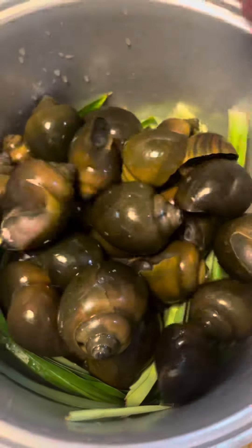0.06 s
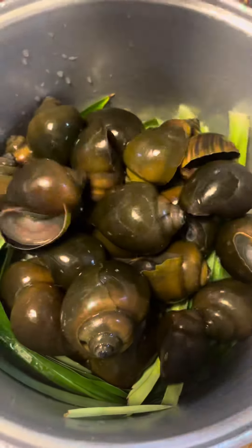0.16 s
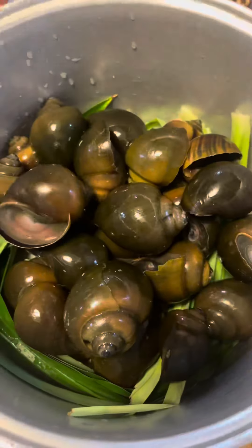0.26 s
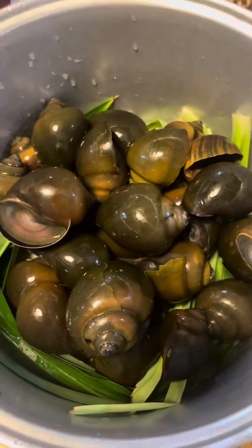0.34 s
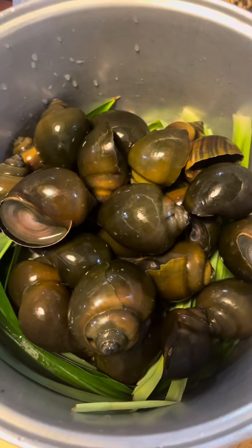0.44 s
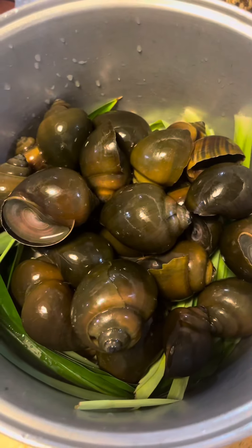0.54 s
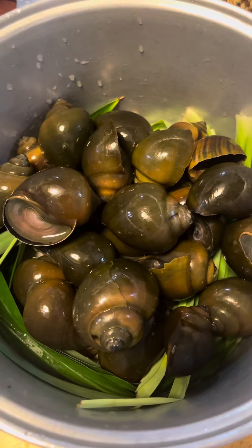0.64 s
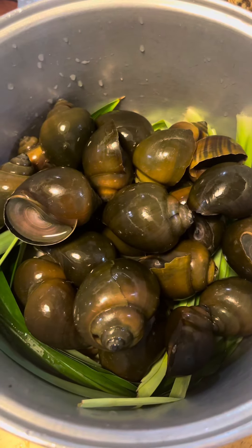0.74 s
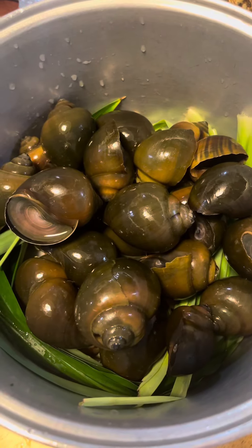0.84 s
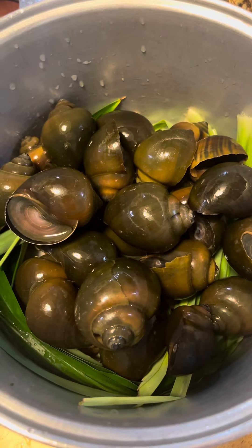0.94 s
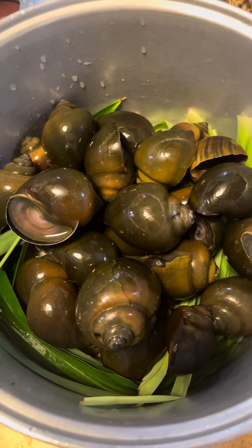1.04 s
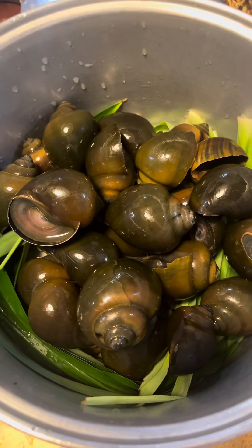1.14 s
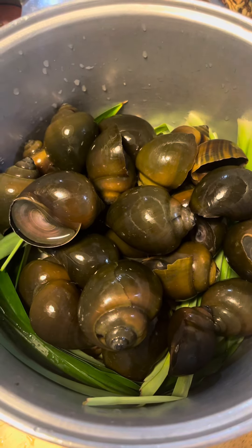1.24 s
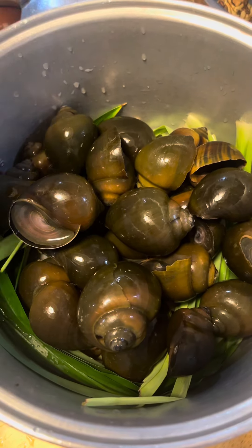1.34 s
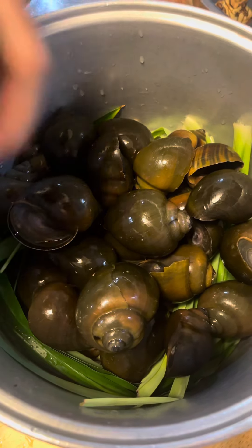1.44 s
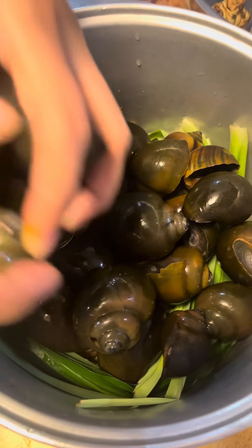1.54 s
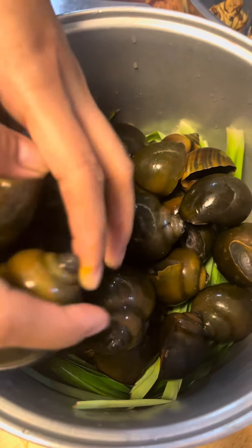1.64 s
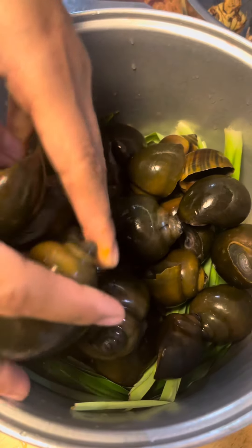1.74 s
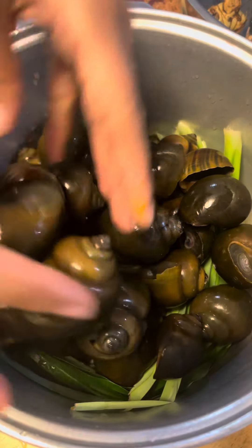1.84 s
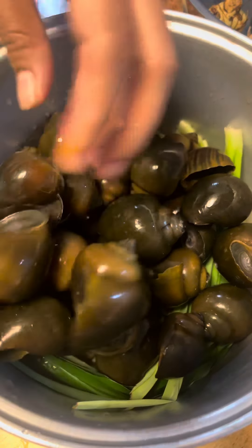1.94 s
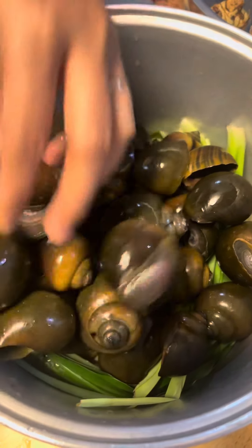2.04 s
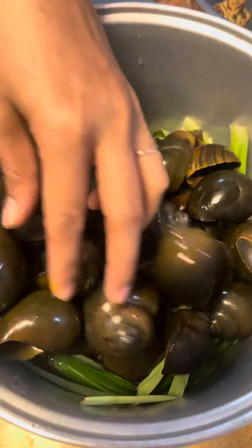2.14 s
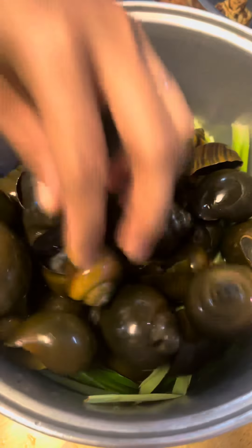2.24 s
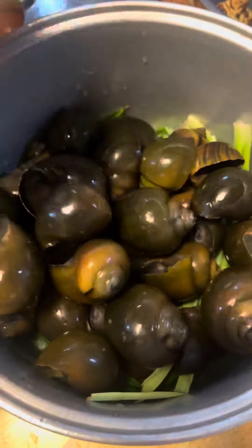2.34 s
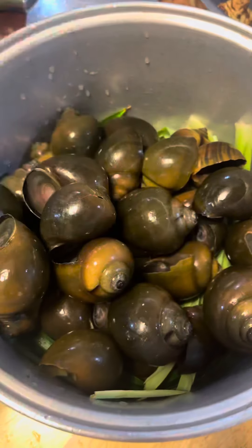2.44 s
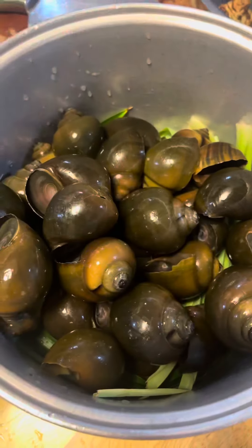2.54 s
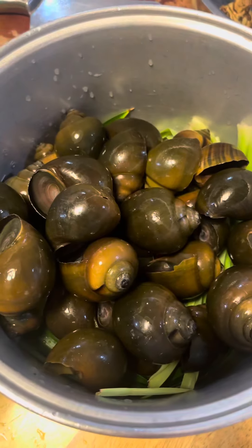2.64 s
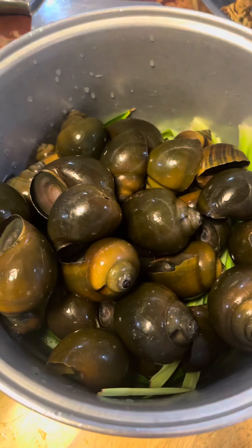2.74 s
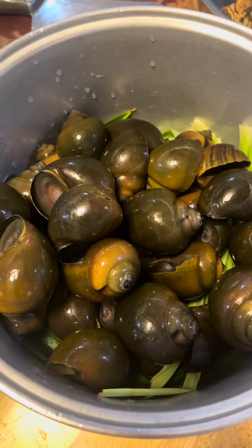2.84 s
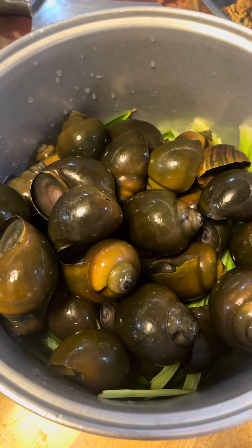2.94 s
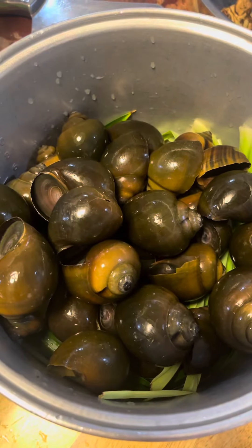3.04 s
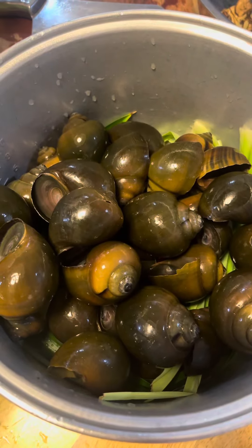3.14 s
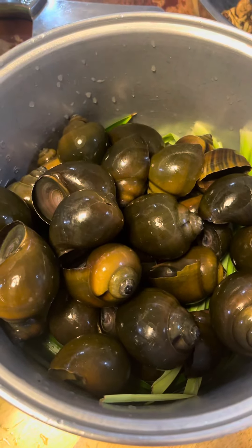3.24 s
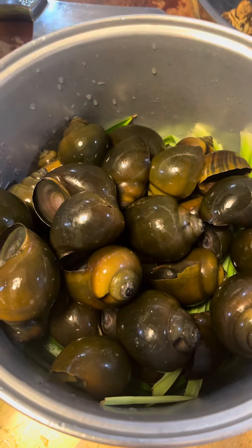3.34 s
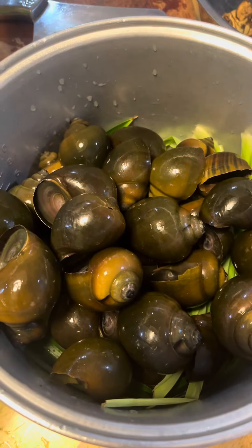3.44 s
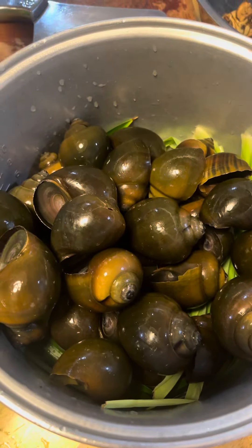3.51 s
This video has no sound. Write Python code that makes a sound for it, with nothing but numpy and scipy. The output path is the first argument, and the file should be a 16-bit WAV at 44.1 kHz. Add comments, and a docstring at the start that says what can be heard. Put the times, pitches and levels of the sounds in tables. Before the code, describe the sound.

Close stereo phone pickup in a small kitchen with low, steady room noise and faint hum. At 0 s shells strike a metal pot, the rim ringing out briefly. From about 0.35 to 1.4 s a hand digs among shells in a hollow basin: woody clacks and gritty grinding, strongest around 0.6-0.9 s. At 1.6-2.4 s a handful clatters into the pot, with hard cracks, scraping, metallic ring and low thuds. More basin clacking and grinding runs 2.45-3.7 s, then a sharp, dense drop at 3.85-4.1 s. Soft bumps follow near 4.3 s and a tiny clink at 4.7. Shells mutter on the bottom from 5 s; a smaller clattering drop comes at 5.3-5.6 s, with light settling until 6.7 and a knock at 6.5. After near quiet, rubbing and dull bumps occur at 7.5-8.1 s, with a clink at 8.06 and a last faint thump at 8.4.

```python
"""Live snails are scooped from a basin and dropped into a metal pot, close to a phone in a small kitchen.
Shells grind and clack as noisy contacts with short modes; the hollow basin colours them by resonance.
Landing shells excite the decaying modes of the pot, then slide and roll in dense showers of contacts.
Soft bumps, light clinks and late rubs use damped modes and shaped noise over steady room noise."""
import sys
import numpy as np
from scipy import signal
from scipy.fft import rfft, irfft, next_fast_len
from scipy.io import wavfile
from scipy.ndimage import uniform_filter1d

SR = 44100
rng = np.random.default_rng(int(sys.argv[2]) if len(sys.argv) > 2 else 0)


def generate_wav(signal):
    """Clip the signal to [-1, 1] and save it as 16-bit WAV at the path in sys.argv[1]."""
    frames = np.transpose(np.atleast_2d(signal))
    scaled = np.clip(frames, -1, 1) * 32767
    pcm = np.round(scaled).astype(np.int16)
    wavfile.write(sys.argv[1], SR, pcm)


N = 399535
TIME = np.arange(N) / SR
SHELL_SAMPLES = 5000
TOUCH_S = .0003  # time constant of the onset of one contact

# modes of the loaded pot wall: [f/Hz, relative level/dB, t60/s]
POT_MODES = [(475, -5, .07), (880, -1, .12), (1720, -9, .16), (2370, -6, .13), (3284, 1, .22),
             (3360, 1, .1), (3772, -5, .18), (5352, -5, .17), (6204, -6, .17), (7073, -5, .17),
             (7392, -3, .17), (10765, -4, .15)]
# modes of the loaded pot bottom: [f/Hz, relative level/dB, t60/s]
BOTTOM_MODES = [(84, -10, 0.11), (168, -11.5, 0.12), (354, -3, 0.023), (468, 2, 0.013)]
# spectrum of the hollow of the basin: [f/Hz, relative density level/dB]
BASIN_SPECTRUM = [(300, -44), (680, 6.5), (850, 12), (1000, 1), (1500, -22.5), (8000, -60)]
# spectrum of shell contacts: [f/Hz, relative density level/dB]
SHELL_SPECTRUM = [(60, -17.5), (200, 2.5), (450, 7.5), (680, 2), (900, 6.5), (1250, -4), (2200, -1),
                  (5500, -3), (8500, -7.5), (11000, -3), (12500, -15.5), (15000, -47)]
# spectrum of dull low contact noise: [f/Hz, relative density level/dB]
RUMBLE_SPECTRUM = [(25, -44.5), (55, 1.5), (100, 4), (320, -1.5), (500, -8.5), (1200, -23.5),
                   (12000, -94.5)]
# the hand works in the basin: [start t/s, end t/s]
IN_BASIN = [(.3, 1.55), (2.42, 3.75)]


def undb(db):
    """Level to amplitude: 20 dB is a factor of ten."""
    return 10 ** (np.asarray(db) / 20)


def unit(x):
    """Energy normalisation: the squared samples sum to 1."""
    return x / np.sqrt(np.sum(x ** 2))


def level(x, db=0):
    """Power normalisation: scale to an rms level in dB."""
    return x * undb(db) / np.sqrt(np.mean(x ** 2))


def fade(t60):
    """Exponential damping: half a second of an envelope that loses 60 dB in t60."""
    return np.exp(-np.log(1000) * TIME[:SR // 2] / max(t60, 1 / SR))


def through(x, response):
    """Linear filtering by convolution with an impulse response; either may have two channels."""
    return signal.oaconvolve(np.atleast_2d(x), np.atleast_2d(response), axes=1)[:, :x.shape[-1]]


def add(track, s, sound):
    """Superposition: mix a sound in at a time in seconds."""
    start = max(int(s * SR), 0)
    track[:, start:start + sound.shape[-1]] += sound[..., :N - start]


def colour(points, size=4096):
    """Minimum phase: fold the cepstrum of a spectrum into a causal response of unit energy."""
    hz, db = np.transpose(points)
    bins_hz = np.arange(size // 2 + 1) * SR / size
    spectrum_db = np.interp(np.log(bins_hz + 1), np.log(hz), db)
    cepstrum = irfft(np.log(undb(spectrum_db)))
    cepstrum[1:size // 2] *= 2
    cepstrum[size // 2 + 1:] = 0
    return unit(irfft(np.exp(rfft(cepstrum))))


def ring(modes, scatter_db=0, detune=0):
    """Modal superposition: damped sines of random sign; strength and pitch may vary between strikes."""
    t = TIME[:SR // 2]
    total = np.zeros(len(t))
    for (hz, db, t60), (strength, sign, shift) in zip(modes, rng.standard_normal((len(modes), 3))):
        tone = np.sin(2 * np.pi * hz * (1 + detune * shift) * t)
        total += undb(db + scatter_db * strength) * np.sign(sign) * fade(t60) * tone
    return unit(total)


def brighten(x, treble_db, split_hz=4000, order=2):
    """Spectral balance: a zero-phase split sets the treble against the body, as contact hardness does."""
    body = signal.sosfiltfilt(signal.butter(order, split_hz, fs=SR, output="sos"), x)
    return body + undb(treble_db) * (x - body)


def stroke(s, hold_s, rise_db_per_s, fall_db_per_s):
    """Exponential envelope of one movement: it swells up to its time, holds and dies away."""
    early_s = np.maximum(s - TIME, 0)
    late_s = np.maximum(TIME - s - hold_s, 0)
    return undb(-rise_db_per_s * early_s - fall_db_per_s * late_s) + 1e-12


def during(spans):
    """Time window: gain 1 within the given spans, 0 outside, with edges softened by a moving average."""
    gate = sum(1. * ((TIME > start) & (TIME < end)) for start, end in spans)
    return uniform_filter1d(gate, SR // 20)


def pock(t60, count):
    """Cavity resonance of one shell: a few quickly damped notes over the range of shell sizes."""
    low_hz, high_hz = 982, 2750  # hollow notes of large to small shells
    t = TIME[:SHELL_SAMPLES]
    hz = low_hz * (high_hz / low_hz) ** ((np.arange(count) + rng.random(count)) / count)
    phase = rng.random((count, 1))
    notes = np.sin(2 * np.pi * (hz[:, None] * t + phase)).sum(0)
    return unit(notes * fade(t60)[:len(t)] * (1 - np.exp(-t / TOUCH_S)))


def shell(ring_t60, crack_t60, echo_db, echo_t60, side_t60=0.12, side_db=-12, count=10):
    """Impact excitation in stereo: a noisy crack, the shell's short modes and dense wall echoes."""
    size = SHELL_SAMPLES
    t = TIME[:size]
    hz = np.geomspace(1100, 11000, count) * np.exp(rng.uniform(-0.204, .2, count))
    strengths = rng.normal(size=(count, 1)) * hz[:, None] ** 0.58
    modes = (np.sin(2 * np.pi * hz[:, None] * t) * strengths).sum(0)
    crack, echoes, rim = rng.standard_normal((3, size))
    mid = unit(modes * fade(ring_t60)[:size])
    mid = mid + unit(crack * fade(crack_t60)[:size])
    mid = mid + undb(echo_db) * unit(echoes * fade(echo_t60)[:size])
    mid = unit(mid * (1 - np.exp(-t / TOUCH_S)))
    # each shell lies in its own spot, so its reflections off the rim reach the two sides differently
    band = signal.butter(2, [1800, 11000], "band", fs=SR, output="sos")
    side = signal.sosfilt(band, rim * fade(side_t60)[:size])
    return mid + undb(side_db) * unit(side) * np.array([[1], [-1]])


def jostle(rate, spread_db, ring_t60, count, bunch_db=0, hollow=0):
    """Shot noise: random contacts (rate per second), mostly weak; they may bunch, and some may be pocks."""
    strengths_db = spread_db * np.minimum(rng.exponential(size=N), 3)
    sizes = (rng.random(N) < rate / SR) * undb(strengths_db)
    # even out the energy over 60 ms, then let it vary slowly in bunches
    sizes = sizes / np.sqrt(np.abs(uniform_filter1d(sizes ** 2, int(.06 * SR))) + 1 / SR)
    slips = np.arange(0, N / SR, .014)
    sizes = sizes * undb(bunch_db * np.interp(TIME, slips, rng.uniform(-1, 1, len(slips))))
    owner = rng.integers(count, size=N)
    shells = []
    for k in range(count):
        if k < hollow * count:
            shells.append(pock(t60=.011, count=2) * np.ones((2, 1)))
        else:
            shells.append(shell(ring_t60, crack_t60=.005, echo_db=-7, echo_t60=.045))
    out = np.zeros((2, N))
    for i in np.flatnonzero(sizes):
        add(out, TIME[i], sizes[i] * shells[owner[i]][:, :SR // 20])
    return out


def kitchen(noise_db=-49.5, apart_db=-16, diffuse_db=14, diffuse_hz=1650, hum_db=-60):
    """Diffuse-field noise, coherent between sides in the bass and less so above, with a faint hum."""
    # steady room noise: [f/Hz, relative density level/dB]
    room_spectrum = [(25, -36), (60, 0.5), (200, -3.5), (300, -6), (500, -14.5), (1800, -23.5), (2900, -17),
                     (4500, -29.5), (11300, -37.5), (13000, -79.5)]
    # hum of an appliance, as resonances fed by noise: [f/Hz, relative level/dB, t60/s]
    hum_modes = [(196.4, -2.5, 0.63), (617, 0, 0.12)]
    noise = through(rng.standard_normal((3, N)), colour(room_spectrum))
    shared, left, right = level(noise, noise_db)
    hum = level(through(rng.standard_normal(N), ring(hum_modes)), hum_db)
    apart = brighten(np.array([left, right]), diffuse_db, diffuse_hz)
    return brighten(shared, -diffuse_db, diffuse_hz) + hum + undb(apart_db) * apart


def slides(gain_db=4, wall_db=-2, bottom_db=-27, count=8):
    """Frictional excitation: skidding shells scrape and drive the wall, relatively more when forceful."""
    # shells slide in the pot: [t/s, hold/s, relative level/dB, treble against body level/dB]
    slide_events = [(0.0, 0.097, -35.5, 7), (1.689, 0.1, -36.5, 6), (1.775, 0.09, -31, 0.5),
                    (1.978, 0.12, -49.5, -7), (2.139, 0.076, -37, -15), (2.334, 0.018, -31.5, -13),
                    (3.911, 0.093, -28.5, 0), (4.608, 0.12, -47, -8), (5.087, 0.0074, -45, -11),
                    (5.356, 0.094, -36.5, 1), (5.472, 0.026, -33, 0.5), (5.568, 0.43, -44.5, -1.5),
                    (5.814, 0.066, -36, -3), (6.324, 0.071, -47, -2), (6.532, 0.037, -46.5, -2)]
    rise_db_per_s, fall_db_per_s = 594, 209
    strokes = [undb(db) * stroke(s, hold_s, rise_db_per_s, fall_db_per_s) for s, hold_s, db, _ in slide_events]
    gain = np.max(strokes, axis=0)
    bright_db = np.array(slide_events)[:, 3][np.argmax(strokes, axis=0)]  # of the strongest slide
    contacts = jostle(rate=1000, spread_db=4.0, ring_t60=0.02, count=40, bunch_db=5.5, hollow=.05)
    scrape = brighten(through(contacts * gain, colour(SHELL_SPECTRUM)), bright_db)
    wall = unit(sum(ring(POT_MODES, detune=.022) for _ in range(count)) * fade(.25))
    pressed = contacts * gain * (gain / gain.max()) ** .25
    singing = through(brighten(pressed, np.minimum(bright_db, 0), 2000), wall)
    bottom = level(through(contacts, ring(BOTTOM_MODES))) * np.sqrt(gain)
    return undb(gain_db) * scrape + undb(wall_db) * singing + undb(bottom_db) * bottom


def knocks(gain_db=19, treble_db=8, wall_db=-3, bottom_db=-10, rim_db=-5):
    """Impulsive modal excitation: a landing shell and its one rebound ring the wall; the bottom thuds."""
    # landings on the pot wall: [t/s, relative body level/dB, treble against body level/dB before treble_db,
    # relative wall ring level/dB, rebound against first blow level/dB]
    landings = [(0.005, -21.5, 0.5, 0, 4.5), (0.05, -17.5, -18, 8, -22), (1.685, -14, 3.5, 8, -10.5),
                (1.763, -21.5, 4.5, 15, -10), (1.772, -17, 0.5, -9, 3.5), (2.1, -15, 1.5, -11.5, -39),
                (2.309, -14.5, 4, 1, -3.5), (3.914, -11.5, -24, -13, -24), (3.924, -13, 0, -22, -3),
                (3.986, -22.5, 4, 3.5, 1.5), (5.316, -18, -11.5, -6, -33), (5.389, -13, 0, 0.5, -10),
                (5.451, -14.5, -4.5, 7, -8.5), (6.538, -21.5, -14, -4.5, -12)]
    # modes of the free pot rim: [f/Hz, relative level/dB, t60/s]
    rim_modes = [(1098, 6, .75), (1776, -3, .45), (2353, 0, .4), (2654, 1, .45), (3192, 0, .6)]
    rebound_s, rim_start_s = .023, 0.033
    out, body = np.zeros((2, N)), colour(SHELL_SPECTRUM)
    for s, db, bright_db, ring_db, rebound_db in landings:
        for at, blow_db in (s, db), (s + rebound_s, db + rebound_db):
            hit = through(shell(ring_t60=0.055, crack_t60=0.062, echo_db=4.0, echo_t60=0.11, side_t60=0.079), body)
            add(out, at, undb(blow_db + gain_db) * brighten(hit, bright_db + treble_db))
            wall = ring(POT_MODES, scatter_db=3, detune=.012)
            add(out, at, undb(blow_db + gain_db + wall_db + ring_db) * wall)
        add(out, s, undb(db + gain_db + bottom_db) * ring(BOTTOM_MODES, detune=.06))
    # the first handful also shakes the rim: a wash of close modes over the plain ones
    wash = sum(ring(rim_modes, detune=.08) for _ in range(3)) * fade(.7) / 2
    add(out, rim_start_s, undb(rim_db) * (ring(rim_modes) + wash))
    return out


def clacks(gain_db=13.0, treble_db=9, pock_db=-3, split_hz=3200, hollow_db=4):
    """Collision of hollow bodies: each touch has a second touch; those in the basin excite its resonance."""
    # clear shell contacts: [t/s, relative body level/dB, treble against body level/dB before treble_db]
    collisions = [(0.368, -27.5, -6.5), (0.396, -22, -17), (0.417, -19.5, -9), (0.531, -23.5, 0.5),
                  (0.582, -13.5, -6.5), (0.616, -15, -0.5), (0.628, -12.5, -30.5), (0.635, -6.5, -20),
                  (0.645, -8, -25), (0.725, -8.5, -27), (0.756, -9.5, -12), (0.765, -10, -18),
                  (0.82, -7, -12.5), (0.878, -15.5, -10), (0.973, -15, -6.5), (1.013, -17, -7.5),
                  (1.034, -15.5, -4), (1.041, -12.5, -10), (1.11, -21.5, -10), (1.181, -23.5, -23),
                  (1.209, -17.5, -9.5), (1.307, -17.5, -15), (1.362, -20.5, -36), (1.606, -24.5, -6.5),
                  (1.632, -14, -3), (1.637, -6.5, -39), (1.667, -10, -13.5), (1.678, -6.5, -11),
                  (2.076, -5.5, -13), (2.192, -21.5, 5), (2.245, -12.5, -7.5), (2.344, -19, 8.5),
                  (2.474, -15.5, -15), (2.572, -17, -18), (2.653, -13, -18), (2.724, -11, -21.5),
                  (2.746, -17, -29), (2.867, -14, -14), (2.95, -12, -5), (3.015, -20, -4),
                  (3.074, -17.5, -19), (3.17, -19.5, 1.5), (3.207, -20.5, -13), (3.57, -23.5, -4.5),
                  (3.64, -23.5, -9), (3.832, -23, -5), (3.865, -6.5, -10), (3.903, -13.5, 0.5),
                  (3.952, -16, 2), (4.112, -20.5, -6.5), (4.281, -22, -8), (4.624, -32.5, -5),
                  (5.363, -25.5, -1), (5.617, -20, -7), (5.728, -29, 1), (5.886, -25, -1),
                  (5.962, -29, 0.5), (6.69, -34.5, -11), (7.987, -34, -6.5), (8.065, -27, -11)]
    chatter_s, chatter_db = .005, -5.5  # second touch: delay scale and level against the first
    out, body = np.zeros((2, N)), colour(SHELL_SPECTRUM)
    for s, db, bright_db in collisions:
        contact = through(shell(ring_t60=.025, crack_t60=.016, echo_db=-4, echo_t60=.05, side_t60=.04), body)
        contact = contact + undb(pock_db) * pock(t60=.026, count=3)
        again = through(shell(ring_t60=.025, crack_t60=.016, echo_db=-3, echo_t60=.06), body)
        first = brighten(contact, bright_db + treble_db, split_hz, order=5)
        add(out, s, undb(db + gain_db) * first)
        second = brighten(again, bright_db, split_hz)
        add(out, s + chatter_s * rng.uniform(.5, 2.4), undb(db + gain_db + chatter_db) * second)
    hollow = colour(BASIN_SPECTRUM)
    hollow = hollow / np.abs(rfft(hollow)).max()
    return out + undb(hollow_db) * through(out * during(IN_BASIN), hollow)


def scoops(gain_db=-2, effort_slope=0.95, tick_db=-11.5, tick_treble_db=6, hollow_db=-16, rumble_db=-7):
    """Granular contact noise: tumbling shells brighten with effort; the basin answers even gentle stirring."""
    # the hand digs into the shells in the basin: [t/s, hold/s, relative level/dB]
    digs = [(0.62, .17, -24), (0.987, 0.26, -35), (2.465, 0.12, -33), (2.9, 0.11, -28.5),
            (3.134, 0.024, -32.5), (3.586, 0.12, -46.5)]
    # spectrum of the grinding shells: [f/Hz, relative density level/dB]
    digging_spectrum = [(60, 10.5), (200, 18.5), (550, -8.5), (1100, 6.5), (2400, 7), (5500, 4), (8500, -1),
                        (11000, 7), (12500, -3), (15000, -32.5)]
    rise_db_per_s, fall_db_per_s = 126, 189
    slump_db, slump_db_per_s, slump_s = -4, 37, 0.37  # after a dig the heap keeps slumping for a while
    gain = np.zeros(N)
    for s, hold_s, db in digs:
        dig = stroke(s, hold_s, rise_db_per_s, fall_db_per_s)
        slump = stroke(s, slump_s, rise_db_per_s, fall_db_per_s) * stroke(s, hold_s, 0, slump_db_per_s)
        gain = np.maximum(gain, undb(db) * np.maximum(dig, undb(slump_db) * slump))
    effort_db = 20 * np.log10(gain / gain.max() + 0.0065)
    contacts = jostle(rate=600, spread_db=3.5, ring_t60=.022, count=90, bunch_db=3.2, hollow=.25)
    body = colour(digging_spectrum)
    grind = undb(gain_db) * brighten(through(contacts * gain, body), effort_slope * effort_db)
    slips = jostle(rate=70, spread_db=3.3, ring_t60=.008, count=40)  # sparser, shorter ticks
    ticks = undb(tick_db) * brighten(through(slips * gain, body), tick_treble_db)
    hollow = undb(hollow_db) * level(through(contacts, colour(BASIN_SPECTRUM))) * gain ** 0.64
    bottom = undb(rumble_db) * level(through(contacts, colour(RUMBLE_SPECTRUM))) * gain
    return grind + ticks + bottom + hollow


def bumps(gain_db=17):
    """Soft impact: hand and pot excite a damped low mode of the counter and a burst of dull noise."""
    # soft bumps of hand and pot: [t/s, relative level/dB]
    bump_events = [(1.039, -15.5), (1.644, -16.5), (4.323, -19), (4.445, -26.5), (7.744, -14),
                   (7.885, -18.5), (8.062, -20.5), (8.414, -25)]
    # mode of the counter under the pot: [f/Hz, relative level/dB, t60/s]
    counter_modes = [(110, 0, 0.19)]
    out, body = np.zeros((2, N)), colour(RUMBLE_SPECTRUM)
    for s, db in bump_events:
        burst = unit(through(rng.standard_normal(SR // 2) * fade(0.2), body))
        add(out, s, undb(db + gain_db) * unit(ring(counter_modes) + burst))
    return out


def rolls(bottom_db=-1, shell_db=-3, treble_db=-16, split_hz=900):
    """Distributed excitation: rolls and soft bumps drive the pot bottom's modes, with a dull shell mutter."""
    # shells roll, or a soft bump mutters, on the pot bottom: [t/s, hold/s, relative level/dB]
    roll_events = [(1.883, 0.43, -40), (4.321, 0.021, -34), (5.046, 0.9, -46.5), (6.095, 0.52, -45.5),
                   (6.81, 0.0084, -49.5)]
    rise_db_per_s, fall_db_per_s = 242, 131
    gain = sum(undb(db) * stroke(s, hold_s, rise_db_per_s, fall_db_per_s) for s, hold_s, db in roll_events)
    contacts = jostle(rate=130, spread_db=4.0, ring_t60=.02, count=30, bunch_db=5)
    mutter = brighten(through(contacts, colour(SHELL_SPECTRUM)), treble_db, split_hz)
    bottom = level(through(contacts, ring(BOTTOM_MODES)), bottom_db)
    return gain * (bottom + level(mutter, shell_db))


def clinks():
    """Stick-slip on a resonator: a tap or a run of uneven skips rings the modes of a utensil."""
    # a utensil is scraped or tapped: [t/s, length/s, peak level of each skip/dB]
    clink_events = [(4.711, 0.027, -44), (6.269, 0.14, -47), (8.061, 0.019, -36.5)]
    # modes of the utensil: [f/Hz, relative level/dB, t60/s]
    utensil_modes = [(2530, 0, .25), (3560, -12, .16), (4570, -9, .18)]
    skip_s = .011
    out = np.zeros((2, N))
    for s, length_s, db in clink_events:
        for skip in range(1 + int(length_s / skip_s)):
            # skips after the first differ slightly in pitch
            clink = ring(utensil_modes, detune=.035 if skip else 0)
            at = s + skip_s * max(skip - rng.random(), 0)
            add(out, at, undb(db) * clink / np.abs(clink).max())
    return out


def rubs():
    """Friction noise: skin slipping along the phone makes dense small contacts, heard as rumble and hiss."""
    # a hand rubs along the phone: [t/s, hold/s, rumble level/dB, hiss level/dB]
    rub_events = [(7.293, 0.28, -64, -58.5), (7.523, 0.095, -31.5, -39.5), (7.733, 0.0049, -27.5, -33),
                  (7.777, 0.12, -72, -46), (7.989, 0.12, -40, -60)]
    # spectrum of the hiss: [f/Hz, relative density level/dB]
    hiss_spectrum = [(300, -1.5), (800, 18), (4000, 6), (11000, 12), (15000, -13)]
    rise_db_per_s, fall_db_per_s = 480, 328
    slips = jostle(rate=1200, spread_db=1, ring_t60=.005, count=12)
    rumble = level(through(slips, colour(RUMBLE_SPECTRUM)))
    hiss = level(through(slips, colour(hiss_spectrum)))
    out = np.zeros((2, N))
    for s, hold_s, low_db, high_db in rub_events:
        movement = stroke(s, hold_s, rise_db_per_s, fall_db_per_s)
        out += movement * (undb(low_db) * rumble + undb(high_db) * hiss)
    return out


def room(x, t60_s=.28, wet_db=-14, apart_db=-15, apart_hz=260):
    """Reverberation as decaying noise: a short tail that differs between the sides above the bass."""
    envelope = fade(t60_s) * (1 - np.exp(-TIME[:SR // 2] / 0.0019))
    shared, left, right = (unit(rng.standard_normal(SR // 2) * envelope) for _ in range(3))
    apart = signal.sosfilt(signal.butter(2, apart_hz, "high", fs=SR, output="sos"), [left, right])
    return through(x, undb(wet_db) * shared + undb(apart_db) * apart)


def aside(x, turn, lift_db):
    """Level and phase cues: more low midrange on the left; upper midrange lifted and turned (rad)."""
    # left microphone port against the right: [f/Hz, level difference/dB]
    port_balance = [(280, -0.5), (720, 10.5), (1600, 0)]
    centre_hz, width_hz = 3400, 1150
    size = next_fast_len(N + SR // 10)
    hz = np.arange(size // 2 + 1) * SR / size
    band = np.exp(-((hz - centre_hz) / width_hz) ** 2)
    left_db = np.interp(hz, *np.transpose(port_balance))
    sides = np.array([[1], [-1]]) / 2  # half of each difference goes to either port
    gain = undb(sides * left_db + lift_db * band)
    phase = np.exp(1j * sides * turn * band)
    return irfft(rfft(x, size) * gain * phase, size)[:, :N]


def scene():
    """Superposition of the sources and their reverberation, with port cues that follow the hand's place."""
    # the hand works at the far side of the pot: [start t/s, end t/s]
    far_side = [(5.0, 6.75)]
    close = slides() + knocks() + clacks() + scoops() + bumps() + rolls() + clinks() + rubs()
    heard = close + room(close)
    basin, far = during(IN_BASIN), during(far_side)
    elsewhere = heard * (1 - basin - far)
    at_basin = aside(heard * basin, turn=1.3, lift_db=3.5)
    at_far_side = aside(heard * far, turn=-3.1, lift_db=2.5)
    return elsewhere + at_basin + at_far_side + kitchen()


def record(dry):
    """Phase difference between two ports, then band limits and hard clipping of the tallest peaks."""
    # lead of the left microphone port over the right: [f/Hz, phase/rad]
    port_lead = [(1900, 0), (3100, 1.1), (4200, 1.2), (4800, 3.0), (5200, 5.1), (6000, 6.3), (9300, 9.6),
                 (12000, 12.55)]
    bass_hz, top_hz = 42, 15750
    size = next_fast_len(N + SR // 10)
    hz = np.arange(size // 2 + 1) * SR / size
    lead = np.interp(hz, *np.transpose(port_lead))
    sides = np.array([[1], [-1]]) / 2
    ports = irfft(rfft(dry, size) * np.exp(1j * sides * lead), size)[:, :N]
    ports = signal.sosfilt(signal.butter(2, bass_hz, "high", fs=SR, output="sos"), ports)
    clipped = np.clip(ports, -1, 1)
    return signal.sosfilt(signal.ellip(8, .2, 70, top_hz, fs=SR, output="sos"), clipped)


dry = scene()
out = record(dry)
generate_wav(out)
```